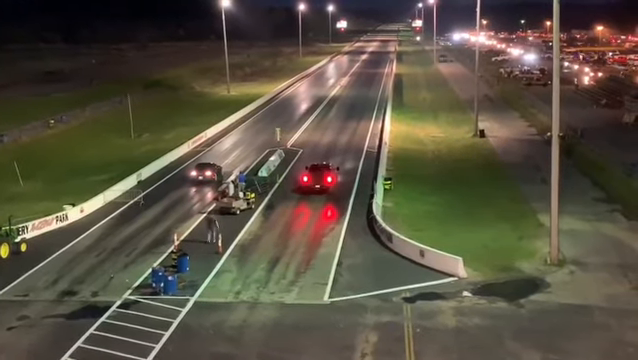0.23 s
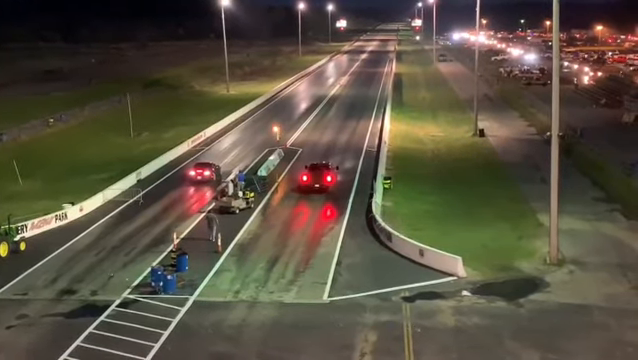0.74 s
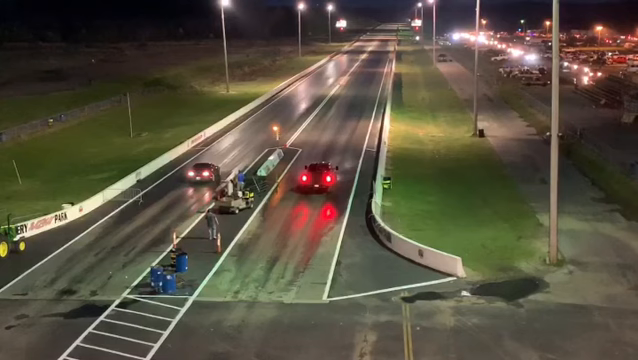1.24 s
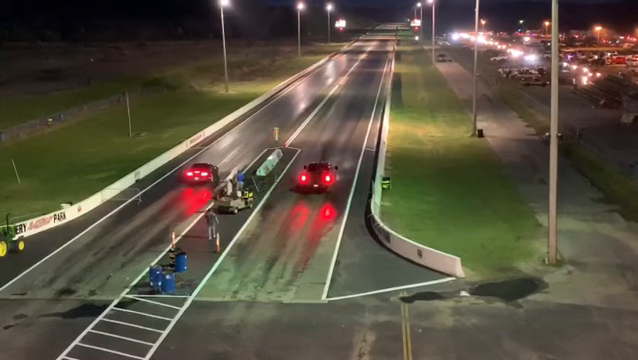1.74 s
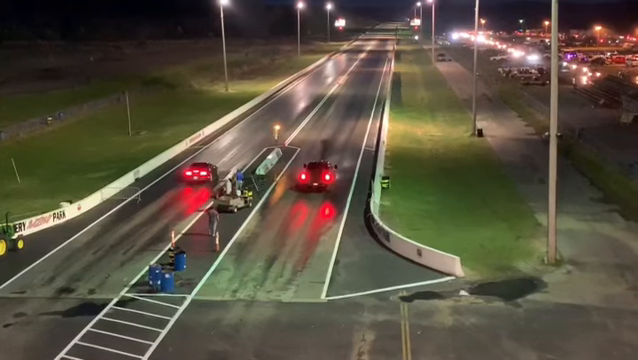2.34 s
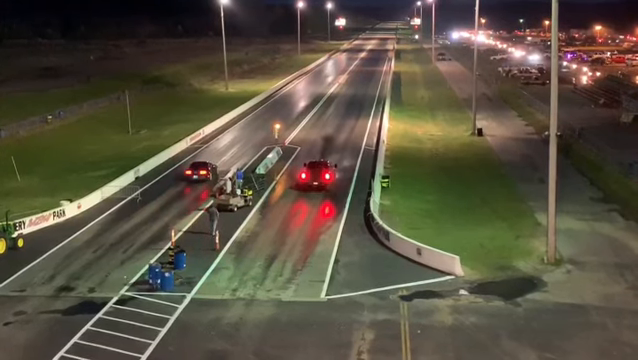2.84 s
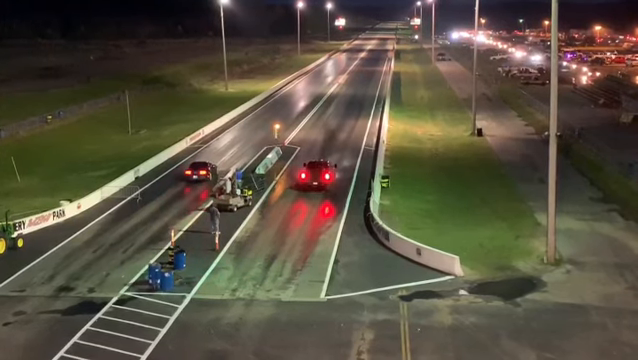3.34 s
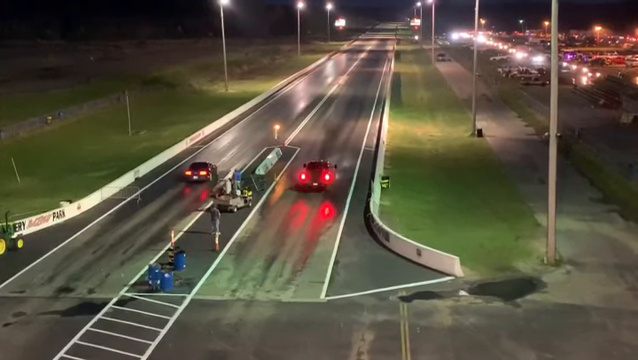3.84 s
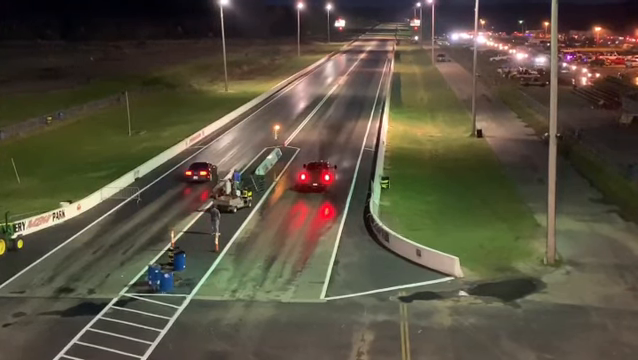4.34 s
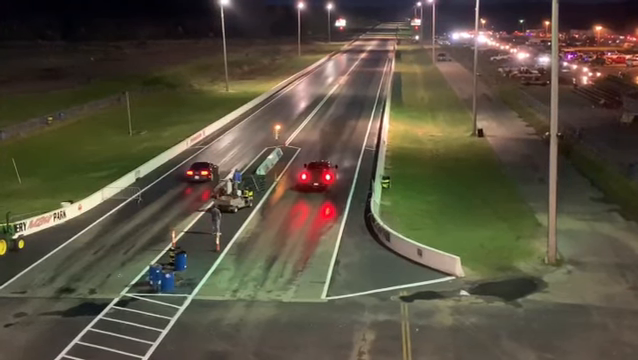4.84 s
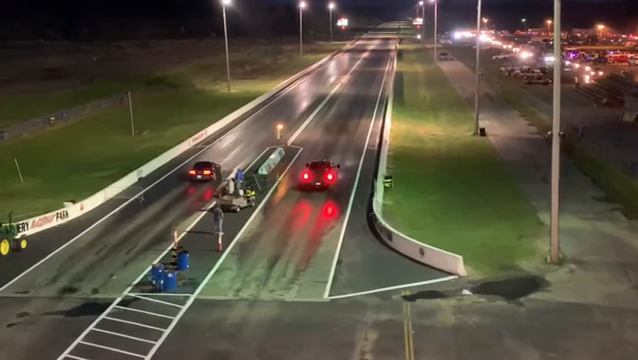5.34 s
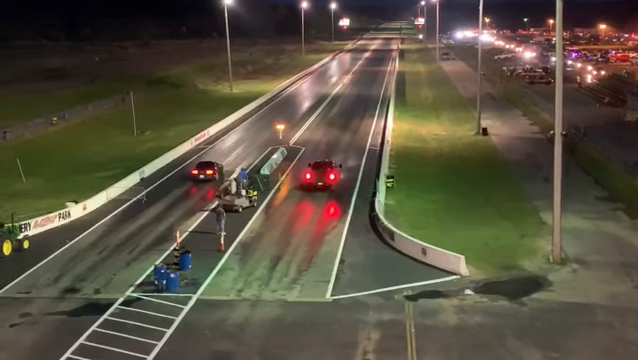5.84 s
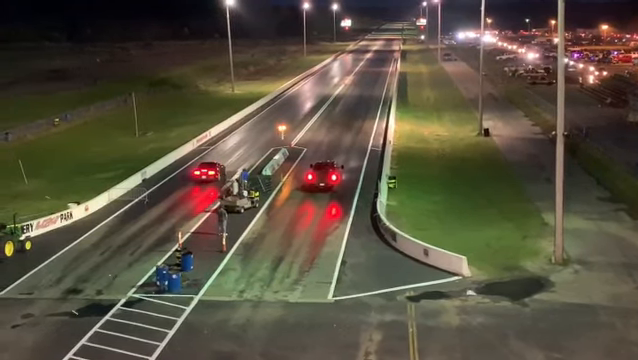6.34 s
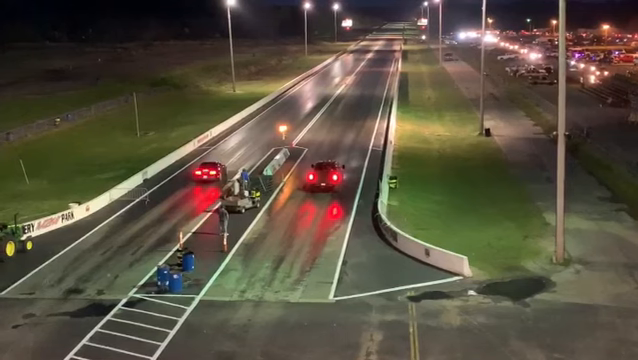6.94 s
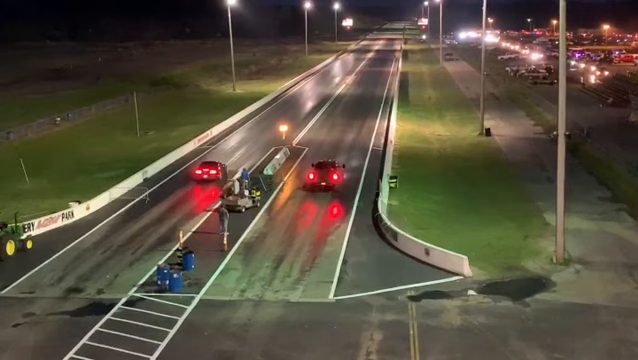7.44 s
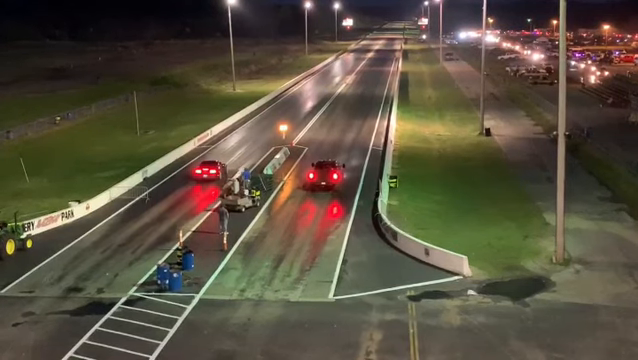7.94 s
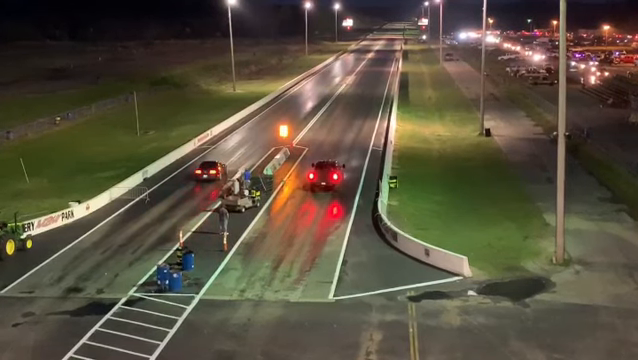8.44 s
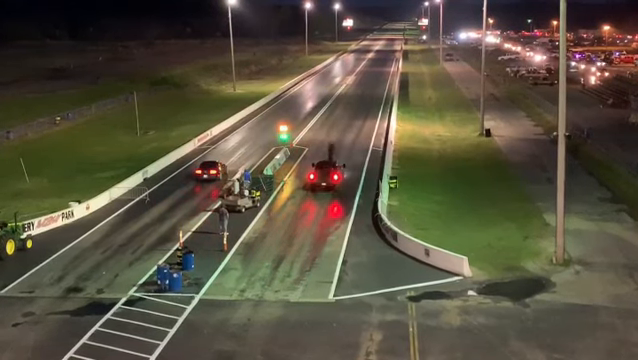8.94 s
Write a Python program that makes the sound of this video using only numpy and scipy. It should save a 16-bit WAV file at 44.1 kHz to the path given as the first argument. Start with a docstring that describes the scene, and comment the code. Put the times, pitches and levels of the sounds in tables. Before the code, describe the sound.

At an outdoor night drag strip, a loud, ragged V8 builds boost for nine seconds, popping and hissing, before a sudden launch roar.

```python
"""A V8 engine booms and barks, climbs in pitch while its turbos wind up to a whistle, then roars as the car leaps.
This is a turbocharged drag car that builds boost against its brake on the starting line and then launches.
Unevenly timed pulses ring exhaust resonances for the bark, and noise that follows the pulses makes the gas hiss.
Moving bands of noise and a thin tone make the turbos. Reflections off the track notch the engine and turbos.
The grounds return a faint echo, and another engine blips further off."""
import sys
import numpy as np
from scipy import signal
from scipy.fft import rfft, irfft, next_fast_len
from scipy.io import wavfile
from scipy.ndimage import uniform_filter1d, minimum_filter1d

SR = 44100
rng = np.random.default_rng(int(sys.argv[2]) if len(sys.argv) > 2 else 0)


def dump(signal):
    """Clip the signal to [-1, 1] and save it as 16-bit WAV at the path in sys.argv[1]."""
    limited = np.clip(np.atleast_2d(signal).T, -1, 1)
    pcm = np.round(limited * 32767).astype(np.int16)
    wavfile.write(sys.argv[1], SR, pcm)


N = 405279

# Blips of the distant engine. Each row: start in seconds, length in seconds, start pitch in Hz,
# end pitch in Hz, level in dB at the middle of the blip.
BLIPS = [(0.158, 0.65, 193.2, 201.3, -27), (1.019, 0.45, 238.2, 273, -29), (5.611, 0.99, 220.5, 270, -36.5)]
# Engine speed. Each row: time in seconds, firing rate in Hz.
FIRING = [(0.0, 88.53), (0.23, 94.88), (0.67, 101.6), (0.99, 102.53), (1.32, 109.03), (1.62, 112.16),
          (2.94, 119.87), (3.4, 121.36), (4.16, 131.14), (5.1, 137.64), (5.74, 144.57), (6.84, 150.68),
          (7.2, 151.47), (7.97, 152.81), (8.23, 158.9), (8.66, 162.6), (8.87, 163.09), (9.04, 178.09),
          (9.19, 191.01)]
# How hard the engine works. Each row: time in seconds, effort in dB.
EFFORT = [(0.0, -28.5), (0.7, -25.5), (2.3, -22.5), (3.4, -27), (4.1, -27), (4.9, -25.5), (5.9, -23.5),
          (7.4, -21), (7.95, -21.5), (8.55, -18.5), (8.84, -14), (8.93, -12), (9.01, -8), (9.1, -19.5),
          (9.19, -17.5)]
# Cylinders in firing order. Each row: strength in dB off boost, strength in dB on full boost,
# brightness in dB off boost, lateness in ms off boost, lateness in ms on full boost.
CYLINDERS = [(-2.3, -2.2, 6, .2, -.3), (-1.8, 1.8, 6, .2, -.4), (.9, -2.4, -3, -.1, -.35),
             (4.3, 3.5, -2.3, -.7, -.23), (0, -1.5, -6, .2, 0), (-4.5, 1.5, 6, .45, -.3),
             (3.5, -3.6, 0, .2, 1.48), (-.3, 3, 6, -.3, -.1)]
# Places in the firing order, counted from 0, of the three cylinders that crack hardest.
HARD_CYLINDERS = (1, 3, 7)
# Their extra crack. Each row: time in seconds, then the lift in dB of each of the three.
HARD_FIRINGS = [(0, 0, 2, 3), (1.2, 0, 3, 3), (2.2, 0, 7, 5), (4, 0, 7, 5), (5, 1, 10, 6), (6.2, 4, 11, 6),
                (7.4, 2, 7, 9), (8.05, 3, 5, 9), (8.45, 4, 2, 8), (8.62, 2, 4, 6), (8.75, 3, 7, -1),
                (8.95, 3, 2, 0)]
# Crankshaft throb. Each row: multiple of the shaft speed, strength in dB against the other rows.
THROB = [(1, -29), (2, 8), (3, 2.5), (3.5, -12), (6, -6.5), (8, -21)]
# Exhaust resonances, low to high. Each row: pitch in Hz, width in Hz, strength in dB.
LOPE_MODES = [(45, 40, -5), (78.5, 61, -11.5), (126, 54.5, -2.5), (192.6, 122, -9.5)]
BARK_MODES = [(446, 220, -17), (489.6, 310, -2), (608.3, 180, 3.5), (863, 48, -15.5)]
RASP_MODES = [(1039, 125, -4.5), (1206, 227, -1), (1643, 120, -5), (2191, 95, -14)]
# Pipe resonances that swell the boom. Each row: firing rate in Hz, half width in Hz, lift in dB.
PIPE_LIFTS = [(104.8, 15, 4), (125.4, 12.5, 12), (161.4, 6.7, 3.5)]
# Partials the pipes reinforce. Each row: multiple of the engine cycle rate, firing rate in Hz where
# it is strongest, half width in Hz, level in dB against the bark.
DRONE = [(35, 103, 4, -11), (46, 101, 5, -10), (42, 116, 7, -10), (38, 120, 9, -14), (32, 128, 24, -14),
         (34, 143, 8, -6.5), (33, 152, 3, -10), (28, 153, 5, -13), (32, 163, 7, -8), (24, 168, 10, -13),
         (20, 162, 6, -19), (16, 166, 9, -19)]
# Charges that pop in the exhaust. Each row: time in seconds, peak level in dB.
POPS = [(0.805, -15), (0.892, -27), (1.039, -21), (1.419, -10.5), (1.493, -11), (1.529, -22), (1.7, -11.5),
        (1.779, -17), (2.191, -12.5), (4.041, -19), (5.519, -14.5), (6.234, -10), (7.858, -11)]
# Resonances of a pop. Each row: pitch in Hz, width in Hz, strength in dB.
POP_MODES = [(570, 310, 1), (1180, 160, -1), (1590, 190, -5)]
# Colour of the gas hiss. Each row: pitch in Hz, strength in dB per Hz.
GAS = [(200, 11), (800, 8), (1500, 12.5), (2200, 2.5), (2800, -11), (3350, 6.5), (3900, -8.5), (4600, 0),
       (5100, -12.5), (6200, -8.5), (7300, -16.5), (8400, -18), (9500, -21.5), (11000, -26.5)]
# First turbo's rush. Each row: time in seconds, centre pitch in Hz.
RUSH = [(0, 2750), (.55, 2914), (.92, 3930), (1.15, 4090), (2, 5440), (2.6, 6230), (3.2, 6660), (5, 8710),
        (5.8, 9750), (9.19, 12700)]
# How the rush carries out of the intake. Each row: pitch in Hz, gain in dB.
RUSH_COLOUR = [(2700, -53.5), (4000, -38.5), (5000, -46.5), (6200, -44.5), (6800, -53), (7500, -68.5),
               (8600, -56.5), (9700, -57), (10800, -62.5)]
# Second turbo's whistle. Each row: time in seconds, pitch in Hz before a small wobble.
WHISTLE = [(6.6, 7850), (6.9, 8080), (7.5, 8300), (8.26, 8560), (8.5, 8900), (8.8, 9200), (9.05, 9720),
           (9.19, 10100)]
# Resonances of the intake duct. Each row: pitch in Hz, width in Hz, strength in dB.
INTAKE_MODES = [(2893, 200, 0.5), (3953, 190, 0), (4970, 420, -10)]
# Resonances of the launch roar. Each row: pitch in Hz, width in Hz, strength in dB.
LAUNCH_MODES = [(626, 52, -2), (1760, 480, -10), (3400, 130, -11), (3880, 200, -19.5), (4650, 150, -17)]
# Cancellations by reflections off the track. Each row: pitch in Hz, width in Hz, depth in dB.
NOTCHES = [(1392.5, 450, 26.5), (1877, 470, 23.5), (2402, 100, 16), (3265, 380, 5.5), (3600, 140, 12.5),
           (4840, 140, 8.5), (5370, 160, 7.5), (6490, 180, 9), (6650, 130, 6)]
# Timing between the microphone ports. Each row: pitch in Hz, lead of the left port in radians.
PORT_PHASE = [(600, 0), (1200, -.08), (1500, -.45), (2150, 0), (2900, .6), (3250, 2.0), (4000, .4),
              (4600, .05), (6700, .1), (7000, 2.5), (7600, 2.9), (8250, .15), (9550, .1), (9800, -2.3)]
# Balance between the ports. Each row: pitch in Hz, left minus right in dB.
PORT_BALANCE = [(150, -1.46), (280, -0.1), (550, 0), (1100, 0.2), (3300, -0.5), (3900, 3.5), (4700, 2),
                (5700, 0.5), (8500, -0.5)]

TIME = np.arange(N) / SR  # seconds
SIZE = next_fast_len(N + SR)  # transform length, with a spare second for tails
BIN_HZ = np.maximum(np.arange(SIZE // 2 + 1) * SR / SIZE, 1)

USUAL_EFFORT_DB = -24
# the engine runs smoother as it climbs through the settle range, and comes on boost higher up
SETTLE_HZ, SETTLE_SPAN_HZ = 108.6, 21.5
BOOST_HZ, BOOST_SPAN_HZ, FULL_BOOST = 156.44, 7.4, 0.97
# at the leap the engine turns ragged and loses this share of its boost
LEAP_S, LEAP_RISE_S, LEAP_BOOST_LOSS = 9.02, 0.14, 0.86
# scatter in strength between firings
ROUGH_SCATTER_DB, SETTLED_SCATTER_DB = 4.5, 3.9
CRACK_SCATTER_DB = 4  # scatter in sharpness
JITTER_MS = 0.03  # scatter in timing
BOOM_DB, BOOM_PER_EFFORT = -20.5, 0.35  # level at usual effort, away from pipe lifts; dB per dB
THROB_DB, THROB_FULL_HZ, THROB_FADE_HZ = -22.5, 163, 21.4  # grows toward this firing rate
LOPE_DB, LOPE_SETTLE_DB, LOPE_LEAP_DB = -23, -5.5, 6.5  # start level, then changes to it
BARK_DB, BARK_BOOST_DB = -24.5, 0.4  # level at usual effort off boost; lift by boost
WALL_MS, WALL_DB = 20.7, -10  # the trackside wall returns the bark
RASP_DB, RASP_BOOST_DB = -31.5, 3  # level at usual effort off boost; boost hardens it
RASP_PER_LIFT = 0.23  # pulses crack harder when the pipe resonates: dB per dB
RASP_IDLE_DB, RASP_FULL_HZ, RASP_SPAN_HZ = -6, 111, 7.6  # softer below the full firing rate
BARK_CHURN_DB, RASP_CHURN_DB = -21, -15  # turbulence that rides on the pulses
GAS_DB, GAS_SWING_DB = -30, 5  # level at usual effort; the most that effort can change it
GAS_SPLIT_HZ, GAS_LOW_DB_PER_OCTAVE, GAS_HIGH_DB_PER_OCTAVE = 2620, -11.5, 2
RUSH_RING_DB = -39
WHISTLE_S, WHISTLE_RISE_S, WHISTLE_DB = 7.3, 0.1, -61  # joins late
HOWL_DB, HOWL_LIFT_DB, HOWL_AT_HZ, HOWL_SPAN_HZ = -55, 15.5, 107.8, 21.7  # peaks at one firing rate
RUMBLE_S, RUMBLE_HALF_S, RUMBLE_DB = 8.79, 0.09, -21  # swells just before the leap
ROAR_S, ROAR_RISE_S, ROAR_DB = 8.95, 0.21, -27.5
LIMIT, LIMIT_S = 0.95, 0.004  # highest peak the limiter lets by; its smoothing time
TOP_HZ = 10900  # nothing much passes above this


def undb(db):
    """Turn decibels into gain."""
    return 10 ** (np.asarray(db) / 20)


def level(x, db):
    """Scale to an average (rms) level, steady or moving."""
    return x * undb(db) / np.sqrt(np.mean(x ** 2))


def steady(x):
    """Even out the loudness over every half second, so that later level curves set it."""
    return x / np.sqrt(uniform_filter1d(x ** 2, SR // 2) + 1e-12)


def ramp(x, start, span):
    """Rise from 0 to 1 as x goes from start over span."""
    return np.clip((x - start) / span, 0, 1)


def bell(x, centre, half_width):
    """A smooth hump, 1 at the centre."""
    return np.exp(-((x - centre) / half_width) ** 2)


def curves(table):
    """Read the columns of a timed table at every sample."""
    seconds, *columns = np.transpose(table)
    return [np.interp(TIME, seconds, column) for column in columns]


def spectrum(points):
    """Join points of pitch and value along a log pitch axis."""
    hz, value = np.transpose(points)
    return np.interp(np.log(BIN_HZ), np.log(hz), value)


def shape(x, response):
    """Filter by giving each pitch its own gain and phase."""
    return irfft(rfft(x, SIZE) * response, SIZE)[..., :N]


def ring(x, modes):
    """Steep resonances: each band-pass acts twice, and neighbours have opposite signs."""
    response = 0
    for k, (hz, width_hz, db) in enumerate(modes):
        off_tune = (BIN_HZ - hz * hz / BIN_HZ) / width_hz
        response = response + (-1) ** k * undb(db) / (1 + 1j * off_tune) ** 2
    return shape(x, response)


def echo(x, lag_ms, db):
    """Add one delayed, scaled copy, as a single reflection does."""
    return shape(x, 1 + undb(db) * np.exp(-2j * np.pi * BIN_HZ * lag_ms / 1000))


def wander(hz):
    """Random motion mostly slower than hz, with a spread of 1."""
    points = rng.standard_normal(N // 20)
    return level(np.interp(2 * hz * TIME, np.arange(len(points)), points), 0)


def air_noise(spread):
    """Stereo noise: a common part and a scattered part for each side."""
    common = rng.standard_normal(N)
    sides = rng.standard_normal((2, N))
    return (common + spread * sides) / np.sqrt(1 + spread ** 2)


def band(hz, width_hz):
    """A narrow band of noise: random motion carried up to a moving pitch."""
    turn = 2 * np.pi * np.cumsum(hz) / SR
    return wander(width_hz) * np.cos(turn) + wander(width_hz) * np.sin(turn)


def clicks(times, sizes):
    """Pulses, each shared between two neighbouring samples to keep its exact time."""
    place = np.clip(times * SR, 0, N - 2)
    i = place.astype(int)
    late_share = place - i
    return np.bincount(i, sizes * (1 - late_share), N) + np.bincount(i + 1, sizes * late_share, N)


def far_engine():
    """A distant engine: only its wavering firing note carries this far, so each blip is one sine."""
    out = np.zeros(N)
    for start, length, from_hz, to_hz, db in BLIPS:
        progress = np.clip((TIME - start) / length, 0, 1)
        hz = (from_hz + (to_hz - from_hz) * progress) * (1 + 0.0087 * wander(25))
        note = np.sin(2 * np.pi * np.cumsum(hz) / SR)
        out += np.sqrt(2) * undb(db) * np.sin(np.pi * progress) * note
    return out


def grounds(x, t60=0.52, wet_db=-21):
    """A faint echo from walls and stands: noise that dies by 60 dB in t60 seconds smears the sound."""
    t = TIME[:SR]
    fade = np.exp(-np.log(1000) * t / t60)
    tail = air_noise(spread=0.5)[:, :SR] * fade * (t > 0.02)  # the first return takes 20 ms
    tail /= np.sqrt(np.sum(tail ** 2) / 2)
    colour_db = spectrum([(120, -32.0), (500, 5.5), (1100, 12.5), (6000, 12.5)])
    return undb(wet_db) * shape(x, rfft(tail, SIZE) * undb(colour_db))


def turbo_rush():
    """The first compressor rushes upward as a band of noise that widens as the wheel speeds up."""
    rush_hz, = curves(RUSH)
    wide = (rush_hz / 3800) ** 2
    core = band(rush_hz, width_hz=100)
    skirts = np.array([band(rush_hz, width_hz=800) for _ in range(3)])
    # one skirt is common, the other two differ between left and right
    rush = (core + wide * (skirts[0] + 0.5 * skirts[1:])) / np.hypot(1, wide)
    carried = shape(rush, undb(spectrum(RUSH_COLOUR)))
    return carried + undb(RUSH_RING_DB) * ring(rush, INTAKE_MODES)


def turbo_whistle():
    """The second compressor joins late as a thin tone with a wobbling pitch and level."""
    hz = curves(WHISTLE)[0] + 14 * wander(40)
    tone = np.sin(2 * np.pi * np.cumsum(hz) / SR)
    return level(tone, WHISTLE_DB + 2.9 * wander(6.7)) * ramp(TIME, WHISTLE_S, WHISTLE_RISE_S)


def intake_howl(hz):
    """Noise rings the intake duct, most strongly around one firing rate."""
    howl_db = HOWL_DB + HOWL_LIFT_DB * bell(hz, HOWL_AT_HZ, HOWL_SPAN_HZ) + 2.7 * wander(14)
    return level(ring(air_noise(spread=0.17), INTAKE_MODES), howl_db)


def boosting(t, hz):
    """Boost from 0 to 1: it builds with engine speed and sags as the car leaps."""
    sag = 1 - LEAP_BOOST_LOSS * ramp(t, LEAP_S, LEAP_RISE_S)
    return FULL_BOOST * ramp(hz, BOOST_HZ, BOOST_SPAN_HZ) * sag


def firings(count, hz):
    """Exhaust pulses: speed steadies their strength, and on boost every second cylinder leads."""
    k = np.arange(1, int(count[-1]))
    cylinder = k % len(CYLINDERS)
    due = np.interp(k, count, TIME)
    rate = np.interp(k, count, hz)
    boost = boosting(due, rate)
    settled = ramp(rate, SETTLE_HZ, SETTLE_SPAN_HZ)
    scatter_db = ROUGH_SCATTER_DB + (SETTLED_SCATTER_DB - ROUGH_SCATTER_DB) * settled
    db_off, db_on, bright_db, late_off, late_on = np.array(CYLINDERS)[cylinder].T
    chance = rng.standard_normal((len(k), 3)).T
    late_ms = late_off + (late_on - late_off) * boost + JITTER_MS * chance[0]
    # a charge can burn poorly, but never much better than full
    db = db_off + (db_on - db_off) * boost + scatter_db * np.minimum(chance[1], 1)
    crack_db = db_on * boost + CRACK_SCATTER_DB * np.minimum(chance[2], 1)
    for number, hard_db in zip(HARD_CYLINDERS, curves(HARD_FIRINGS)):
        crack_db = crack_db + (cylinder == number) * np.interp(due, TIME, hard_db)
    return due + late_ms / 1000, undb(db), undb(bright_db * (1 - boost)), undb(crack_db)


def launch(hz):
    """A low rumble swells, then the climbing firings and the tyres roar as the car leaps away."""
    rumble = level(ring(rng.standard_normal(N), [(62.5, 47, 0)]), RUMBLE_DB)
    rumble = rumble * bell(TIME, RUMBLE_S, RUMBLE_HALF_S)
    times, sizes, _, _ = firings(np.cumsum(hz) / SR, hz)
    pulses_and_noise = level(clicks(times, sizes), 1.8) + air_noise(spread=0.55)
    roar = level(ring(pulses_and_noise, LAUNCH_MODES), ROAR_DB + 0.5 * wander(38))
    return rumble + roar * ramp(TIME, ROAR_S, ROAR_RISE_S)


def gas_hiss(puff, hz, effort_db):
    """Gas hisses in step with the puffs: louder with effort until the flow chokes, brighter with speed."""
    hiss_db = GAS_DB + GAS_SWING_DB * np.tanh(effort_db / GAS_SWING_DB)
    gusts = air_noise(spread=0.22) * (1 + 0.64 * puff)
    hiss = level(shape(gusts, undb(spectrum(GAS))), hiss_db)
    low = shape(hiss, 1 / (1 + (BIN_HZ / GAS_SPLIT_HZ) ** 8))
    high = hiss - low
    octaves = np.log2(hz / hz.mean())
    return low * undb(GAS_LOW_DB_PER_OCTAVE * octaves) + high * undb(GAS_HIGH_DB_PER_OCTAVE * octaves)


def pops():
    """Lone charges pop in the exhaust: single clicks ring it."""
    times, db = np.transpose(POPS)
    one_click = 1.0 * (TIME == 0)
    peak = np.abs(ring(one_click, POP_MODES)).max()
    return ring(clicks(times, undb(db)), POP_MODES) / peak


def crank_throb(count, hz):
    """The crankshaft throbs at multiples of its speed; four firings make one turn."""
    shaft = 2 * np.pi * count / 4
    throb = sum(undb(db) * np.cos(multiple * shaft) for multiple, db in THROB)
    growth = bell(np.minimum(hz, THROB_FULL_HZ), THROB_FULL_HZ, THROB_FADE_HZ)
    return level(throb, THROB_DB + wander(2.4)) * growth


def exhaust_lope(times, sizes, hz):
    """Differences between firings, with turbulent rumble, ring the lowest exhaust resonances."""
    settle_db = LOPE_SETTLE_DB * ramp(hz, SETTLE_HZ, SETTLE_SPAN_HZ)
    leap_db = LOPE_LEAP_DB * ramp(TIME, LEAP_S, LEAP_RISE_S)
    uneven = level(clicks(times, sizes - sizes.mean()), 0) + level(rng.standard_normal(N), 9.3)
    return steady(ring(uneven, LOPE_MODES)) * undb(LOPE_DB + settle_db + leap_db)


def drone(bark, count, hz):
    """The pipes reinforce single partials of the bark, in step with it, each around one engine speed."""
    out = np.zeros(N)
    for k, at_hz, span_hz, db in DRONE:
        turn = np.exp(2j * np.pi * k * count / len(CYLINDERS))
        # average the bark in step with the turning partial to find its phase
        partial = uniform_filter1d(bark / turn, SR // 2) * turn
        tone = partial.real / np.abs(partial)
        out += np.sqrt(2) * undb(db) * bell(hz, at_hz, span_hz) * tone
    return out


def exhaust_bark(times, sizes, bright, churn, count, hz):
    """Dull cylinders ring the lower resonances, bright ones the upper; partials swell by wall and pipes."""
    pulses = level(np.array([clicks(times, sizes / bright), clicks(times, sizes * bright)]), 0)
    low, high = pulses + undb(BARK_CHURN_DB) * churn
    rung = ring(low, BARK_MODES[:2]) + ring(high, BARK_MODES[2:])
    bark = steady(echo(rung, lag_ms=WALL_MS, db=WALL_DB))
    return steady(bark + drone(bark, count, hz))


def exhaust_rasp(cracks, churn):
    """Sharp cracks with a close reflection, plus turbulence, ring the upper exhaust resonances."""
    doubled = echo(cracks, lag_ms=3.35, db=-13.5)
    return steady(ring(doubled + undb(RASP_CHURN_DB) * churn, RASP_MODES))


def engine(hz, effort_db):
    """Firings boom, throb, lope, bark and rasp through the exhaust; a puff of gas follows each."""
    count = np.cumsum(hz) / SR  # firings so far
    boost = boosting(TIME, hz)
    times, sizes, bright, sharpness = firings(count, hz)
    cracks = level(clicks(times, sharpness), 0)
    # each puff dies within a few milliseconds
    puff = level(shape(cracks, 1 / (1 + 1j * BIN_HZ / 90) ** 2), 0)
    churn = puff * rng.standard_normal(N)

    lift_db = sum(db * bell(hz, centre, width) for centre, width, db in PIPE_LIFTS)
    boom_db = BOOM_DB + BOOM_PER_EFFORT * effort_db + lift_db
    bark_db = BARK_DB + effort_db + BARK_BOOST_DB * boost
    low_speed_db = RASP_IDLE_DB * ramp(RASP_FULL_HZ, hz, RASP_SPAN_HZ)
    rasp_db = RASP_DB + effort_db + RASP_PER_LIFT * lift_db + low_speed_db + RASP_BOOST_DB * boost

    boom = level(np.cos(2 * np.pi * count), boom_db)
    throb = crank_throb(count, hz)
    lope = exhaust_lope(times, sizes, hz)
    bark = exhaust_bark(times, sizes, bright, churn, count, hz) * undb(bark_db)
    rasp = exhaust_rasp(cracks, churn) * undb(rasp_db)
    return boom + throb + lope + bark + rasp + pops() + gas_hiss(puff, hz, effort_db)


def track_notches():
    """Reflections off the track cancel the direct sound around certain pitches."""
    response = 1
    for centre, width_hz, depth_db in NOTCHES:
        off_tune = (BIN_HZ - centre * centre / BIN_HZ) / width_hz
        response = response * (1 - (1 - undb(-depth_db)) / (1 + 1j * off_tune))
    return response


def scene():
    """The notched engine and turbos, the launch, the echo of them all, and a distant engine."""
    hz, = curves(FIRING)
    effort_db = curves(EFFORT)[0] - USUAL_EFFORT_DB
    turbos = turbo_rush() + turbo_whistle() + intake_howl(hz)
    car = shape(engine(hz, effort_db) + turbos, track_notches()) + launch(hz)
    return far_engine() + grounds(car) + car


def record(dry):
    """Two microphone ports differ in phase and level; a limiter holds the highest peaks; the top is cut."""
    side = np.array([[1], [-1]]) / 2  # half of each difference goes to each side
    balance = undb(side * spectrum(PORT_BALANCE))
    ports = shape(dry, balance * np.exp(1j * side * spectrum(PORT_PHASE)))
    hold = int(LIMIT_S * SR)
    peaks = np.abs(ports).max(axis=0)
    needed_gain = LIMIT / np.maximum(peaks, LIMIT)
    gain = uniform_filter1d(minimum_filter1d(needed_gain, hold), hold)
    top_cut = signal.ellip(10, 0.2, 80, TOP_HZ, fs=SR, output="sos")
    return signal.sosfilt(top_cut, ports * gain)


dry = scene()
out = record(dry)
dump(out)
```